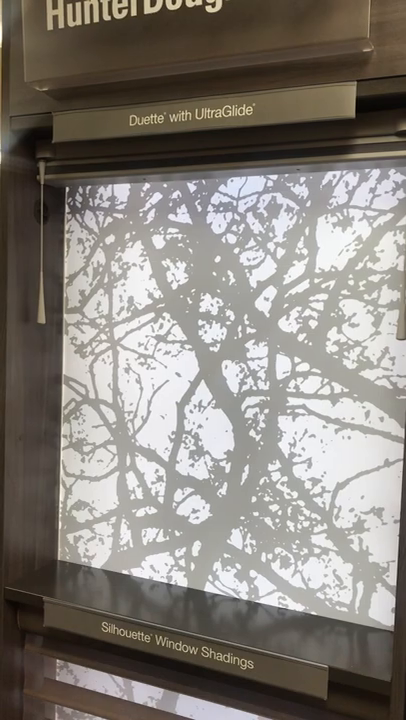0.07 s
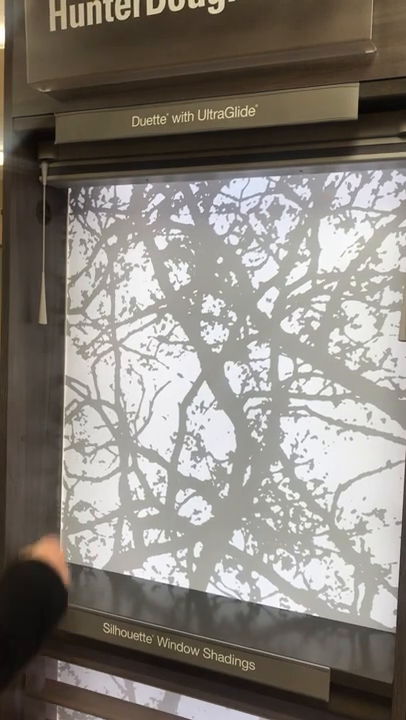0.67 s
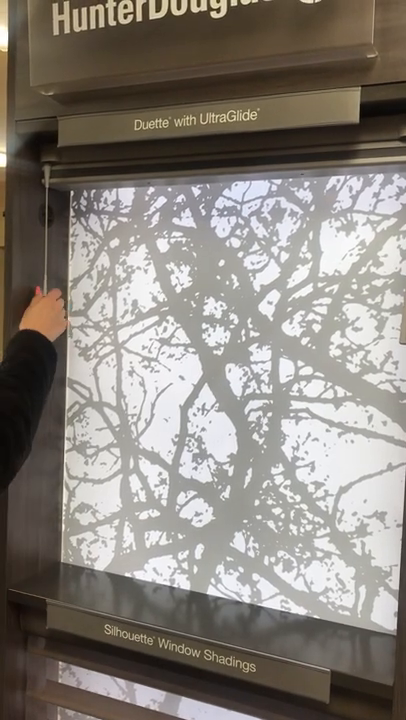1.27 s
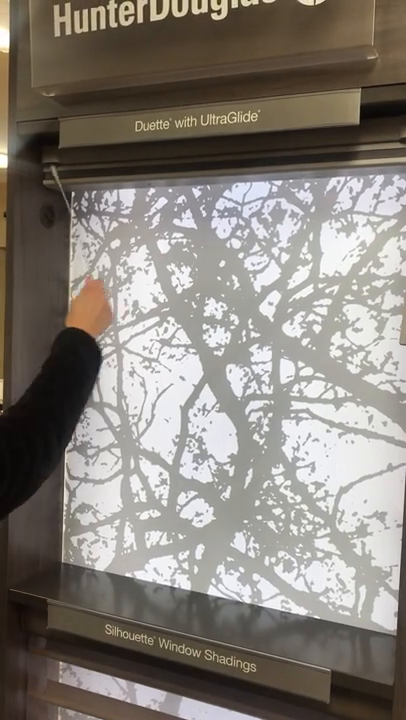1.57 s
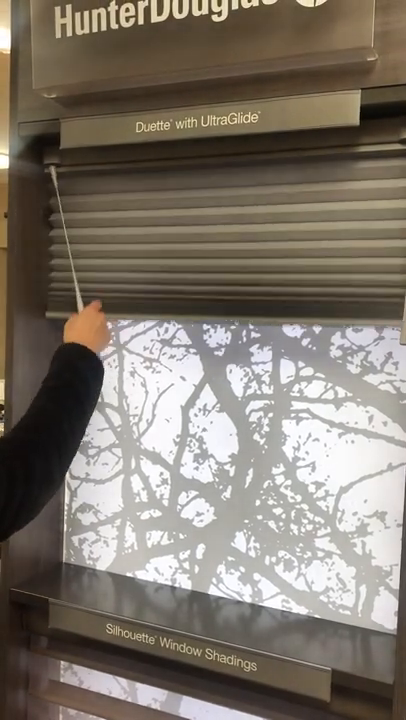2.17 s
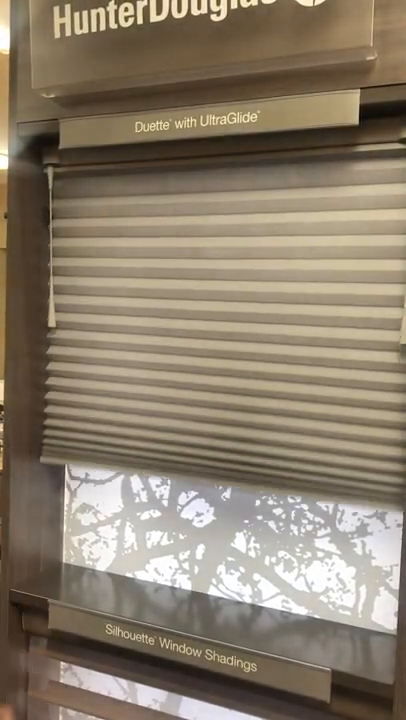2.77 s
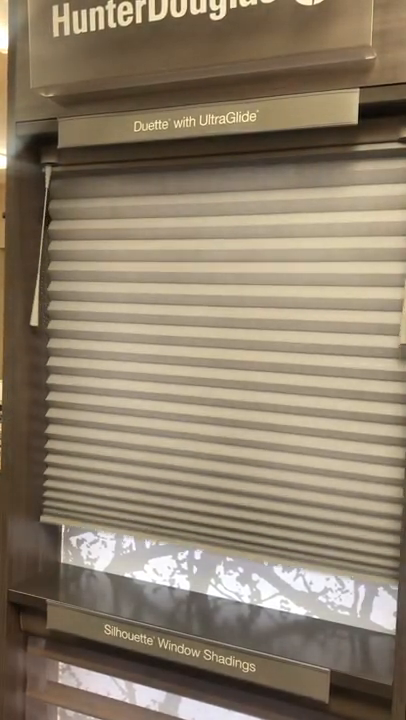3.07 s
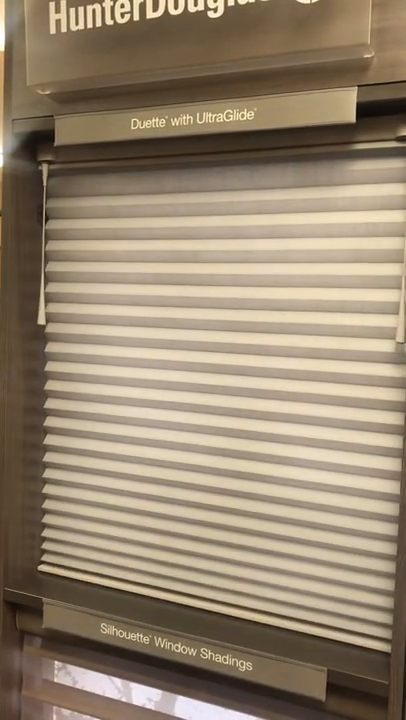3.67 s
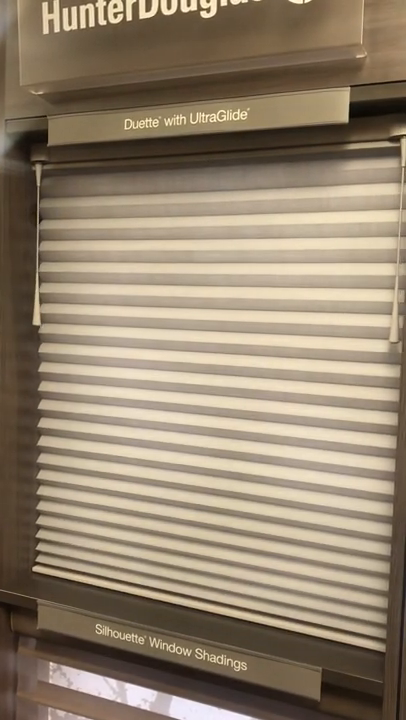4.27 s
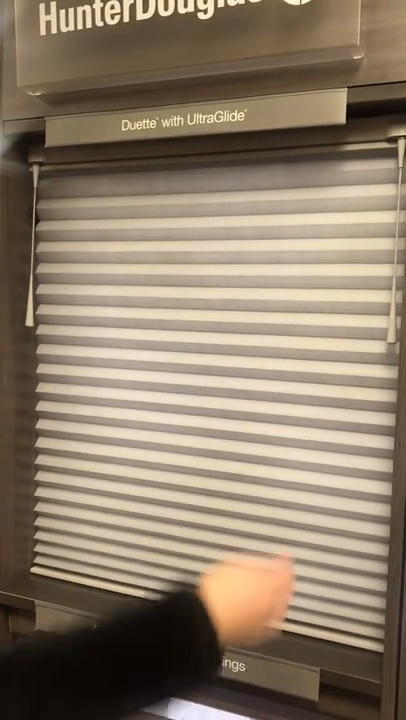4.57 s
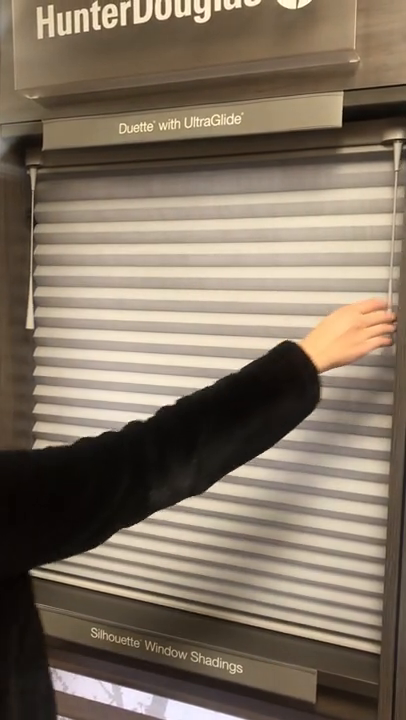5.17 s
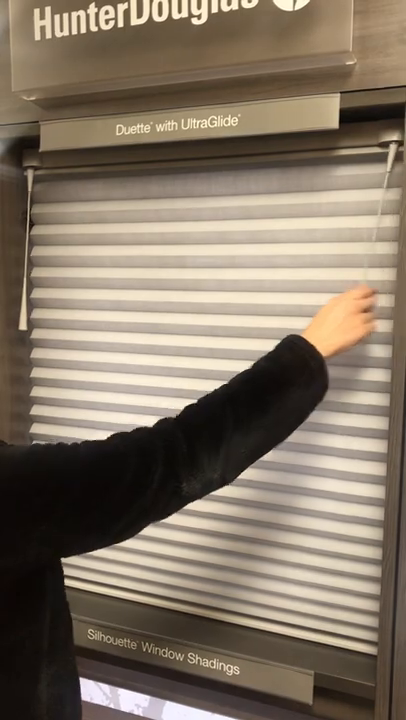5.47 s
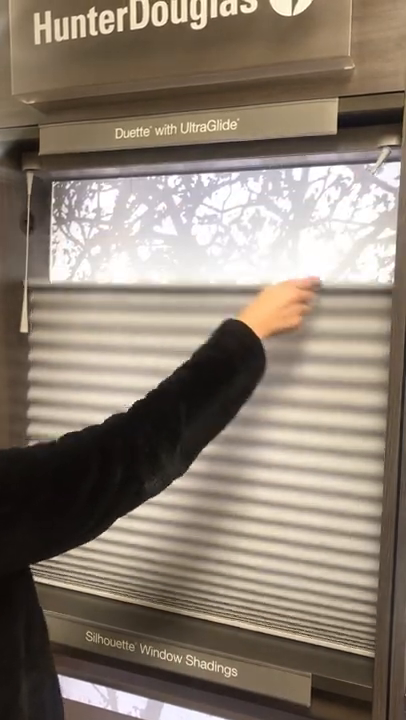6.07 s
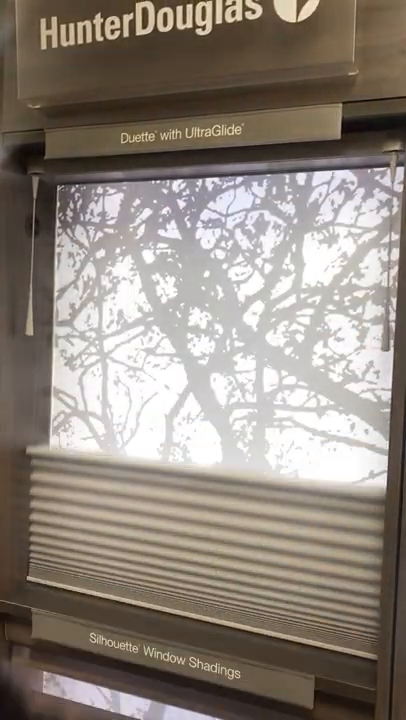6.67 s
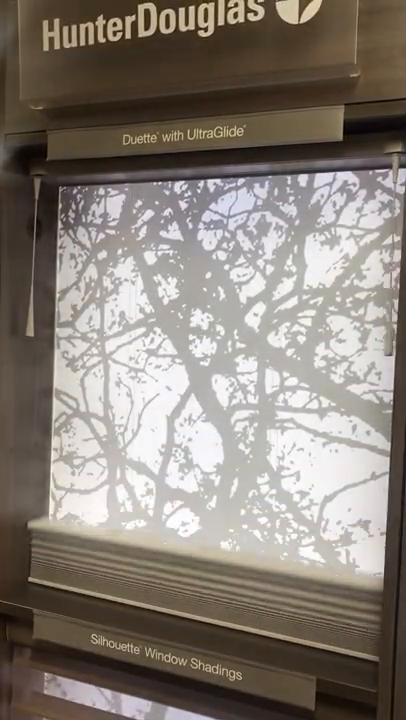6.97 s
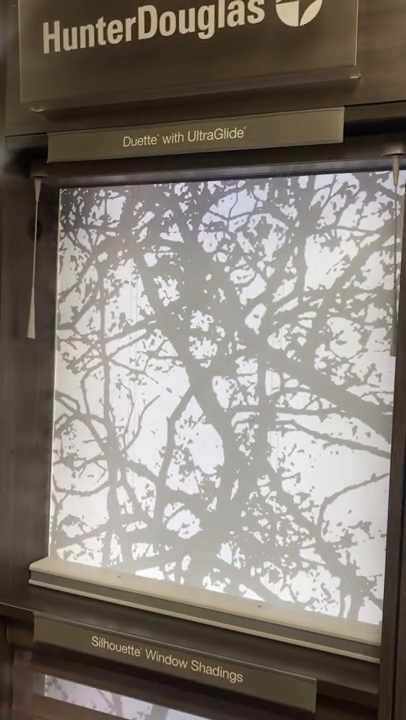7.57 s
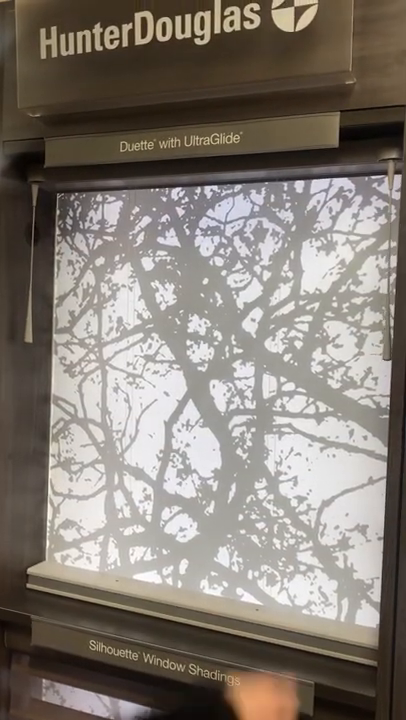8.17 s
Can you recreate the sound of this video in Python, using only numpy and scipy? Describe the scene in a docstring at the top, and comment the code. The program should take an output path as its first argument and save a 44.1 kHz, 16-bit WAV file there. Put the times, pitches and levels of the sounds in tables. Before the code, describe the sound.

In a quiet showroom with faint ventilation hum, a sleeve brushes and fingers catch a cord. A clutch clicks sharply and a pleated window shade slides down with a raspy whir and rustle, its tassel tapping the rail, then lands with a knock and low thump. After a pause, another click starts a second whirring glide with a brief judder, tiny squeaks and a tassel clack, ending in light clicks. The sound is fairly close, with slight reverberation.

```python
"""A pleated window shade is lowered by its cords in a quiet showroom: bottom rail first, then top rail.
Stick-slip friction of the cords drives the resonances of the spools, while the rail drones and the
pleats hiss. Impacts of clutch, tassel, fingers and frame excite the modes of the hollow head rail.
A sleeve brushes, and the room reverberates. Underneath, ventilation rushes and hums with two fans
slowly beating, and electronics tick faintly."""
import sys
import numpy as np
from scipy import signal
from scipy.fft import rfft, irfft, next_fast_len
from scipy.io import wavfile
from scipy.ndimage import uniform_filter1d, map_coordinates

SR = 44100
rng = np.random.default_rng(int(sys.argv[2]) if len(sys.argv) > 2 else 0)


def output_pcm(signal):
    """Save a mono or channel-first signal as 16-bit PCM at the path in sys.argv[1].

    Samples are clipped to [-1, 1] before scaling.
    """
    pcm = np.clip(np.atleast_2d(signal).T, -1, 1) * 32767
    wavfile.write(sys.argv[1], SR, np.round(pcm).astype(np.int16))


N = 371322

def amp(db):
    """Amplitude ratio of a level in decibels."""
    return 10 ** (np.asarray(db) / 20)

def unit(x):
    """Normalisation to an rms of 1."""
    return x / np.sqrt(np.mean(x ** 2) + 1e-20)

def clock():
    """Sample times in seconds."""
    return np.arange(N) / SR

def along(points, hz):
    """Interpolation of (Hz, value) points on a logarithmic frequency axis."""
    freqs, values = np.transpose(points)
    return np.interp(np.log(hz + 1), np.log(freqs + 1), values)

def wobble(rate):
    """Random modulation: a spline through `rate` knots a second."""
    return map_coordinates(rng.standard_normal(int(N * rate / SR) + 4), [clock() * rate])

def filtered(x, response):
    """Linear filtering: the spectrum is multiplied by a frequency response."""
    size = x.shape[-1]
    padded = next_fast_len(size + 8192)
    return irfft(rfft(x, padded) * response(np.fft.rfftfreq(padded, 1 / SR)), padded)[..., :size]

def noise(response):
    """Coloured noise of rms 1: white noise through a filter."""
    return unit(filtered(rng.standard_normal(N), response))

def band(hz, lo, hi):
    """Band-pass gain with fourth-order slopes."""
    return 1 / np.sqrt((1 + (lo / (hz + 1)) ** 8) * (1 + (hz / hi) ** 8))

def body(hz, colour, modes):
    """Gain of a resonant body: Lorentzian peaks in dB on a broad spectrum."""
    lift_db = sum(db / (1 + (2 * (hz - centre) / width) ** 2) for centre, width, db in modes)
    return amp(along(colour, hz) + lift_db)

# The showroom's decay. Each row: frequency in Hz, reverberation time in seconds.
ROOM_T60 = [(100, 0.72), (400, 0.44), (1500, 0.35), (5000, 0.26), (14000, 0.13)]

def room(x):
    """Reverberation: convolution with a noise tail in which each frequency decays at its own rate."""
    hz, t, spectrum = signal.stft(rng.standard_normal(SR // 2), SR, nperseg=256)
    tail = signal.istft(spectrum * amp(-60 * t / along(ROOM_T60, hz)[:, None]), SR, nperseg=256)[1]
    tail *= 1 - np.exp(-np.arange(len(tail)) / SR / 0.0034)
    return signal.fftconvolve(x, tail / np.linalg.norm(tail))[:N]

# Spectrum of the rushing air. Each row: frequency in Hz, relative level in dB.
AIR_COLOUR = [(100, -7.5), (140, -13.5), (180, -19.5), (250, -22), (340, -29), (430, -25.5), (734, -30),
              (2050, -33.5), (4870, -38.5), (8360, -42), (10400, -45), (13200, -40.5), (16000, -46.5)]
# Its resonances. Each row: centre in Hz, width in Hz, lift in dB.
AIR_MODES = [(321.3, 110, 3.5), (1243, 96, 1), (6160, 300, 3.5), (13100, 2400, 4.5)]

def ventilation(air_db=-69, rumble_hz=47, rumble_db=-67):
    """Flow noise: a broadband rush of air over a narrow-band duct rumble."""
    air = noise(lambda hz: body(hz, AIR_COLOUR, AIR_MODES) * band(hz, 125.6, 20000))
    duct = noise(lambda hz: np.exp(-((hz - rumble_hz) / 9) ** 2) + 0.22 * band(hz, 45, 85) * (hz > 33))
    return amp(air_db + 0.13 * wobble(2.92)) * air + amp(rumble_db) * duct

def fan_hum(fan_hz=83.085, beat_hz=0.5, in_step_s=1.44, fan_db=-67, mains_hz=120, mains_db=-76):
    """Beating: two fans of nearly equal frequency drift in and out of phase over a mains hum."""
    fans = sum(np.sin(2 * np.pi * hz * (clock() - in_step_s) + 0.08 * wobble(4.8))
               for hz in (fan_hz - beat_hz / 2, fan_hz + beat_hz / 2))
    mains = np.sin(2 * np.pi * mains_hz * clock() + 0.33 * wobble(2))
    return np.sqrt(2) * (amp(fan_db) * fans + amp(mains_db) * mains)

# Faint tones of the ventilation. Each row: frequency in Hz, level in dB.
FAN_TONES = [(345, -77), (1045, -90), (1285, -86)]

def fan_tones():
    """Random amplitude and phase modulation makes each tone waver."""
    return sum(amp(db + 2.5 * wobble(5)) * np.sin(2 * np.pi * hz * clock() + 2.9 * wobble(35))
               for hz, db in FAN_TONES)

def interference(first_s=0.0295, period_s=0.1024, level_db=-63, t60=0.0082):
    """A pulse train: the electronics tick in decaying bursts of high treble noise."""
    since = (clock() - first_s) % period_s
    return amp(level_db - 60 * since / t60) * noise(lambda hz: band(hz, 11300, 15500))

def whine(start_s=7.1, swell_s=0.15, centre_hz=8290, width_hz=160, level_db=-87):
    """Narrow-band noise is heard as a thin whistle, entering near the end of the descent and staying."""
    whistle = noise(lambda hz: np.exp(-((hz - centre_hz) / width_hz) ** 2))
    return amp(level_db) * whistle * np.clip((clock() - start_s) / swell_s, 0, 1)

# Brushes of sleeve and fingers. Each row: centre in seconds, level in dB, half length in seconds.
SLEEVE_BRUSHES = [(0.778, -71, 0.079), (1.018, -76, 0.11), (1.486, -76.5, 0.6), (1.735, -73, 0.035),
                  (4.434, -72.5, .05), (4.673, -77, 0.12), (5.393, -73, .04), (5.743, -55.5, 0.027),
                  (8.284, -70.5, 0.036)]

def sleeve():
    """Sliding friction of cloth: soft noise in Gaussian swells."""
    swell = sum(amp(db) * np.exp(-((clock() - s) / half) ** 2) for s, db, half in SLEEVE_BRUSHES)
    cloth = [(100, -34), (350, 0.5), (1500, 0.5), (5000, -4.0), (9000, -11.5), (15000, -18.5)]  # Hz, dB
    return swell * noise(lambda hz: amp(along(cloth, hz)))

def rings(rows, rise_s, t60):
    """Damped oscillation: single tones build quickly and decay exponentially."""
    out, t = np.zeros(N + SR), np.arange(SR // 2) / SR
    for start, hz, db in rows:
        envelope = amp(db - 60 * t / t60) * (1 - np.exp(-t / rise_s))
        out[round(start * SR):][:len(t)] += envelope * np.sin(2 * np.pi * hz * t)
    return out[:N]

# Modes of the display frame. Each row: start in seconds, frequency in Hz, level in dB.
FRAME_MODES = [(3.545, 53.6, -50), (3.545, 164.4, -44.5)]

def frame_boom():
    """Free vibration: the frame booms in its low modes as the bottom rail lands."""
    return rings(FRAME_MODES, rise_s=0.0094, t60=0.38)

# Chirps of the cord. Each row: start in seconds, frequency in Hz, level in dB.
CORD_CHIRPS = [(5.901, 3330, -42), (5.986, 1750, -42), (6.208, 1810, -32.5)]

def cord_chirps():
    """Friction excites brief tones as the cord slides in its guide."""
    return rings(CORD_CHIRPS, rise_s=0.001, t60=0.075)

# Spectrum of an impact. Each row: frequency in Hz, relative level in dB.
BLOW_COLOUR = [(40, -16), (130, -4), (300, -2.5), (1000, 8), (4000, -5.5), (7000, -12.5), (15500, -18.5)]
# Resonances of the head rail. Each row: centre in Hz, width in Hz, lift in dB.
RAIL_MODES = [(277.4, 120, 8.5), (734, 260, 8), (1350, 200, 5.5), (1573, 110, 5.5), (2060, 270, 9),
              (2555, 100, 4), (3390, 990, 11.5), (4490, 120, 9.5), (5100, 160, 1), (6675, 700, 6),
              (8140, 300, 7), (13000, 1500, 6)]
# Its bending modes. Each row: frequency in Hz, relative level in dB, multiple of bending_t60.
BENDING_MODES = [(148.3, -11, 1.3), (231, -10, 0.67), (278.2, -0.5, 0.57), (365, -9.5, 0.83)]

def blow(contact, tilt_db, t60, ping_hz, bending_t60=0.085):
    """Impact excitation: the head rail bends, pings and rattles, its low bands ringing longest."""
    t = np.arange(SR // 2) / SR
    *band_db, ping_db = contact
    octaves = np.log2(np.array([300, 1000, 3500, 8000, 10000]) / 1000)
    thud_db, clack_db, snap_db, crack_db, sizzle_db = np.array(band_db) + tilt_db * octaves
    envelope = lambda rise, life: (1 - np.exp(-t / rise)) * amp(-60 * t / life)
    mode = lambda hz, rise, life: np.sin(2 * np.pi * hz * t) * envelope(rise, life)
    bend = sum(amp(db) * mode(hz, 0.0028, share * bending_t60) for hz, db, share in BENDING_MODES)
    ping_t60 = 0.041 * np.sqrt(1300 / ping_hz)  # higher pings die sooner
    sound = amp(thud_db) * bend + amp(ping_db) * mode(ping_hz, 0.00017, ping_t60)
    rattle = [(130, 420, thud_db - 9, 0.0035, 2.0 * t60),
              (514, 1810, clack_db, 0.0016, 1.98 * t60),
              (2305, 12000, snap_db, 0.00069, t60),
              (4970, 13000, crack_db, 0.0005, 0.86 * t60),
              (9700, 25000, sizzle_db, 0.00052, 0.45 * t60),
              (2400, 9000, snap_db - 1, 0.00031, 0.0082)]  # the instant of contact
    for low_hz, high_hz, db, rise_s, band_t60 in rattle:
        response = lambda hz: body(hz, BLOW_COLOUR, RAIL_MODES) * band(hz, low_hz, high_hz)
        ring = filtered(rng.standard_normal(len(t)), response)
        fade = envelope(rise_s, band_t60)
        sound += amp(db) * unit(ring * fade) * np.sqrt(np.mean(fade ** 2))
    return sound

def strikes(contact, rows):
    """Superposition: blows of one kind of contact add, each at its own time and level."""
    out = np.zeros(N + SR)
    for start, db, tilt_db, t60, ping_hz in rows:
        sound = amp(db) * blow(contact, tilt_db, t60, ping_hz)
        out[round(start * SR):][:len(sound)] += sound
    return out[:N]

# Judder as the top rail sets off. Each row: start in seconds, end in seconds, level in dB.
JUDDERS = [(5.879, 5.92, -51.5), (5.993, 6.13, -55.5)]

def judder(contact, spacing_s=0.03, scatter_s=0.004, spread_db=1.2, tilt_db=-5, t60=0.062, ping_hz=1100):
    """A quasi-periodic impact train: dull bumps, uneven in time and strength."""
    bumps = [(rng.normal(s, scatter_s), rng.normal(db, spread_db), tilt_db, t60, ping_hz)
             for start, end, db in JUDDERS for s in np.arange(start, end, spacing_s)]
    return strikes(contact, bumps)

# What each contact excites. Each lists thud, clack, snap, crack, sizzle and ping in relative dB.
CLUTCH_CONTACT = (0.5, -1.1, 4, 6, -1.5, -1)
TASSEL_CONTACT = (-8, -1.5, 9.5, 3, 8, 3.5)
FINGER_CONTACT = (10, -0.6, -3.5, -7, -17, -4)
FRAME_CONTACT = (10, -0.2, -9, -19.5, -17.5, -0.5)
# The impacts. Each row: start in seconds, level in dB, tilt in dB per octave, t60 in seconds, ping in Hz.
CLUTCH_CLICKS = [(1.7616, -41, -3, .035, 1270), (1.7646, -29, 0, 0.027, 1292),
                 (5.7633, -51.5, .5, .016, 1760), (5.793, -44.5, 2.27, 0.048, 6300),
                 (6.08, -54, 2.5, .025, 1760), (6.208, -46, -5, .02, 1750), (7.179, -44, -2.5, 0.035, 3440),
                 (7.297, -54, -2, 0.057, 4300)]  # the clutch snaps free and ticks under way
TASSEL_HITS = [(2.4853, -32.5, 1, 0.031, 3480), (6.4554, -31, -1.5, 0.022, 2720),
               (6.4605, -34.5, -2.5, 0.052, 898)]  # the released tassel flies back against the head rail
CORD_TOUCHES = [(1.37, -62.5, -1.5, 0.13, 700), (1.456, -67.5, -0.7, 0.12, 1250),
                (1.61, -58.5, 1.2, .06, 3870), (5.271, -62, 0.2, 0.079, 1260),
                (5.506, -71.5, 3.5, .09, 3280), (5.725, -62, -1.5, .14, 400), (1.72, -64.5, -1.5, .14, 600)]  # fingers catch the cord and its tassel
RAIL_KNOCKS = [(2.7749, -36, -1.5, 0.045, 733), (2.794, -44, -1, 0.021, 720),
               (3.077, -47.5, -5, 0.073, 606), (3.134, -56.5, -6.5, 0.043, 700),
               (3.5384, -34, 6.5, 0.041, 1600), (3.552, -38, 3.5, 0.065, 907),
               (5.799, -49.5, -4, 0.034, 394)]  # a moving rail knocks on the frame or lands on the sill

def impacts():
    """One resonator, several exciters: each contact draws its own timbre from the head rail."""
    return (judder(FRAME_CONTACT)
            + strikes(CLUTCH_CONTACT, CLUTCH_CLICKS)
            + strikes(TASSEL_CONTACT, TASSEL_HITS)
            + strikes(FINGER_CONTACT, CORD_TOUCHES)
            + strikes(FRAME_CONTACT, RAIL_KNOCKS))

def slips(per_second=830, spread_db=4.5):
    """Stick-slip friction: a Poisson train of tiny impulses of uneven size."""
    chance, size, push = rng.random(N), rng.standard_normal(N), rng.standard_normal(N)
    return unit((chance < per_second / SR) * amp(spread_db * size) * np.sign(push))

def flicker(x, depth_db, band_hz, window, bins, frames):
    """Spectral modulation: random gains, smoothed over bins and frames, make peaks come and go."""
    hz, _, spectrum = signal.stft(x, SR, nperseg=window)
    field = uniform_filter1d(rng.standard_normal(spectrum.shape), size=bins, axis=0)
    field = unit(uniform_filter1d(field, size=frames, axis=1))
    gain = amp(depth_db * field * band(hz, *band_hz)[:, None])
    return signal.istft(spectrum * gain, nperseg=window)[1][:N]

def friction(grain_db, shimmer_db, speckle_db):
    """Friction noise with slips: narrow peaks shimmer as the contact wanders, the treble speckles."""
    rub = rng.standard_normal(N) + amp(grain_db) * slips()
    rub = flicker(rub, shimmer_db, band_hz=(760, 9000), window=1024, bins=2, frames=16)
    return flicker(rub, speckle_db, band_hz=(3000, 20000), window=128, bins=3, frames=3)

def speed(glide, lag_s=0, lead_s=0):
    """Relative speed of a rail, 0 to 1: exponential run-up, gentle slowing, linear braking."""
    start, run_up, stop, braking, slowing_db = glide
    since = np.maximum(clock() - start - lag_s, 0)
    brake = np.clip((stop - lead_s - clock()) / braking, 0, 1)
    return (1 - np.exp(-since / run_up)) * amp(-slowing_db * since) * brake

def spool_swell(turns):
    """Amplitude modulation in dB: the rasp swells once a spool turn, less as the cord settles."""
    deepest, period, depth_db, settling = turns
    since = clock() - deepest
    return depth_db * np.cos(2 * np.pi * since / period) * np.exp(-np.abs(since) / settling)

def descent(rub, glide, turns, rustles, colour, spool, rasp_db, drone_db, hiss_db, flutter_db):
    """Source and filter: friction feeds rail drone, cord rasp and pleat hiss, all growing with speed."""
    part = lambda lo, hi: unit(filtered(rub, lambda hz: body(hz, colour, spool) * band(hz, lo, hi)))
    cord_speed = speed(glide)
    pleat_speed = speed(glide, lag_s=0.031, lead_s=0.054)  # the fabric starts later and rests sooner
    rustle_db = sum(db * np.exp(-((clock() - s) / half) ** 2) for s, half, db in rustles)
    drone = cord_speed ** 0.65 * amp(drone_db + 0.7 * wobble(25)) * part(125, 815)
    rasp = cord_speed * amp(rasp_db + spool_swell(turns)) * part(816, 6600)
    hiss = pleat_speed * amp(hiss_db + rustle_db + 0.87 * wobble(45)) * part(6900, 20000)
    return (drone + rasp + hiss) * amp(flutter_db * wobble(70))  # the spool turns a little unevenly

# Motion of the rails. Each lists start, run-up, stop and braking in seconds, slowing in dB per second.
BOTTOM_GLIDE = (1.755, 0.12, 3.63, 0.187, 3.8)
TOP_GLIDE = (5.76, 0.15, 7.355, 0.11, 0.71)
# Spool turns. Each lists time of deepest swell and period in seconds, depth in dB, settling in seconds.
BOTTOM_TURNS = (1.95, .12, 4.5, 0.45)
TOP_TURNS = (6.08, 0.2, .4, 1.2)
# The pleats peel open or close up. Each row: centre in seconds, half length in seconds, lift in dB.
BOTTOM_RUSTLES = [(2.17, 0.15, 0.5)]
TOP_RUSTLES = [(6.1, 0.32, 4.8), (7.17, .07, 2.1)]
# Spectrum of each descent. Each row: frequency in Hz, relative level in dB.
BOTTOM_COLOUR = [(53, -33), (90, 3), (192, -6.5), (266, 5), (376, 0.5), (521, -8.5), (721, -7.5),
                 (956, -11.5), (1270, -7.5), (1640, -8), (2710, -12.5), (3360, -12.5), (10400, -28),
                 (12600, -18.5), (16000, -29.5)]
TOP_COLOUR = [(53, -37), (90, -4.5), (360, 1.5), (521, -4.5), (661, -5), (977, -8.5), (1160, -9.5),
              (1790, -4.5), (2230, -9), (3290, -9.5), (5300, -17.5), (6720, -19), (7660, -23),
              (13500, -23.5), (16000, -23.5)]
# Resonances that each spool drives. Each row: centre in Hz, width in Hz, lift in dB.
BOTTOM_SPOOL = [(284, 83, -3.5), (398, 23, 3.5), (669, 190, 4.5), (1047, 78, 5.5), (1250, 180, 8),
                (1447, 66, 6.5), (1950, 570, 7), (2475, 100, 5), (3340, 550, 7), (4085, 960, 10),
                (5730, 400, 7.5), (6530, 240, 4.5), (8160, 630, 5.5), (9500, 300, 5.5), (12630, 520, 0.5)]
TOP_SPOOL = [(342, 150, 2.4), (428, 42, 5.2), (580, 25, 6.9), (665, 34, 7.2), (1180, 95, 8.8),
             (1344, 110, 4.8), (1650, 49, 8.8), (1814, 52, 4.6), (2070, 210, 4.1), (2440, 130, 4.2),
             (3324, 230, 6.5), (3900, 180, 3.8), (4300, 550, 5), (5880, 260, 6), (6700, 240, 5.2),
             (11700, 900, 4.4)]

def lowering():
    """Forced vibration: cords rub over their spools as the bottom rail descends, then the top rail."""
    rub = friction(grain_db=-5, shimmer_db=3, speckle_db=2)
    bottom = descent(rub, BOTTOM_GLIDE, BOTTOM_TURNS, BOTTOM_RUSTLES, BOTTOM_COLOUR, BOTTOM_SPOOL,
                     rasp_db=-49, drone_db=-48.5, hiss_db=-54.5, flutter_db=0.8)
    rub = friction(grain_db=-7, shimmer_db=2.5, speckle_db=1.6)
    top = descent(rub, TOP_GLIDE, TOP_TURNS, TOP_RUSTLES, TOP_COLOUR, TOP_SPOOL,
                  rasp_db=-45, drone_db=-49, hiss_db=-59.5, flutter_db=0.4)
    return bottom + top

def scene():
    """Superposition of the shade's direct sound, its reverberation and the background."""
    hits = impacts() + cord_chirps() + frame_boom()
    sliding = lowering()
    shade = hits + sliding + room(amp(-9) * hits + amp(-15) * sliding)
    return (shade + sleeve() + ventilation() + fan_hum() + fan_tones() + whine() + interference())[None]

def record(dry, open_s=0.078, fade_s=0.008, cutoff_hz=15900):
    """Gating and band limiting: the sound fades in after a moment and passes an ideal low-pass."""
    gate = np.clip((clock() - open_s) / fade_s, 0, 1)
    return filtered(dry * gate, lambda hz: hz < cutoff_hz)

dry = scene()
out = record(dry)
output_pcm(out)
```